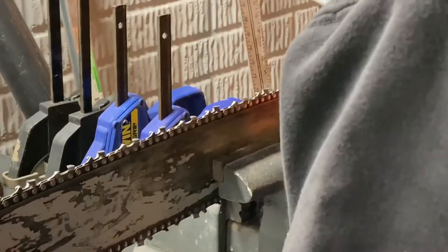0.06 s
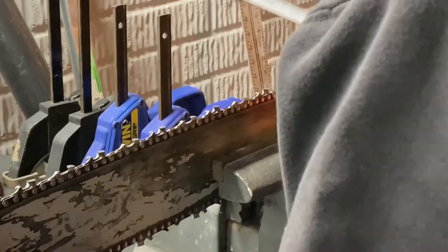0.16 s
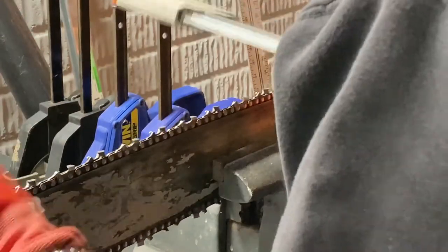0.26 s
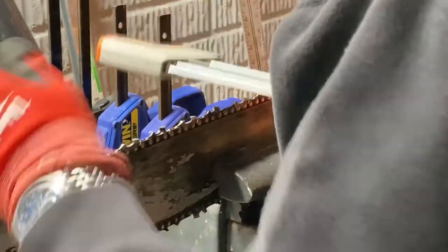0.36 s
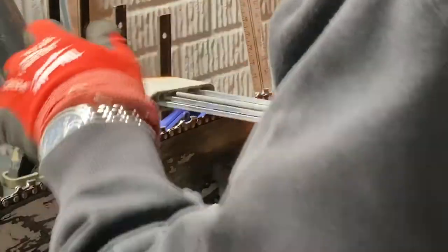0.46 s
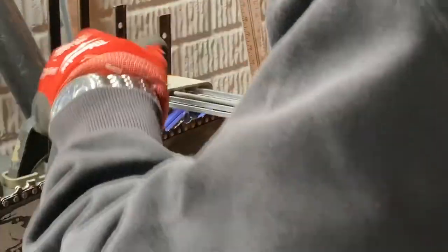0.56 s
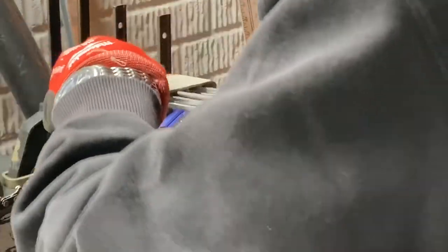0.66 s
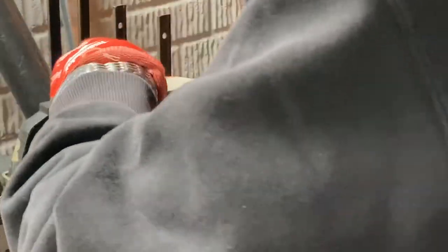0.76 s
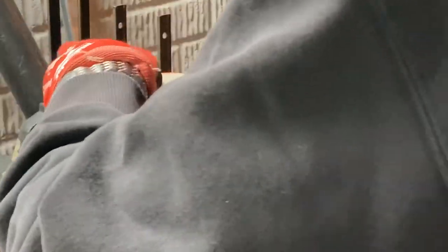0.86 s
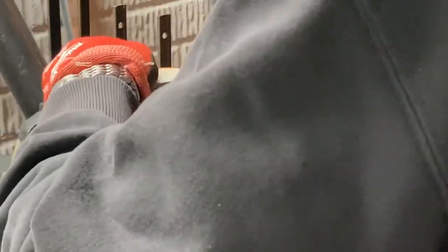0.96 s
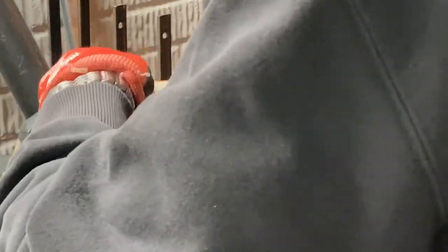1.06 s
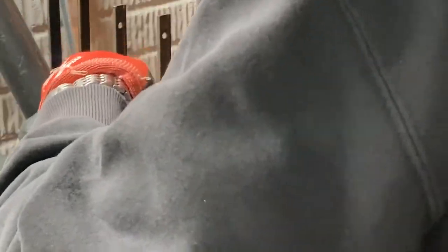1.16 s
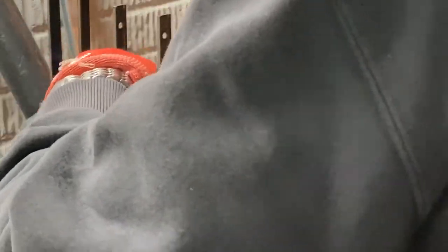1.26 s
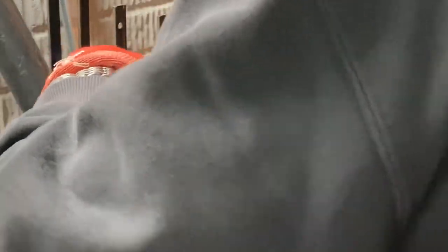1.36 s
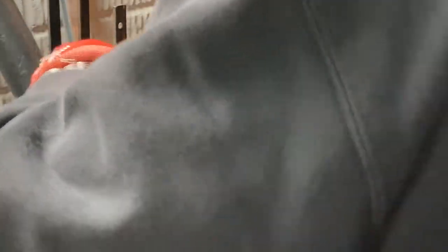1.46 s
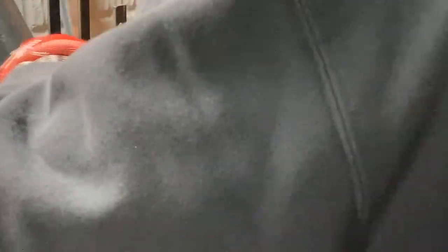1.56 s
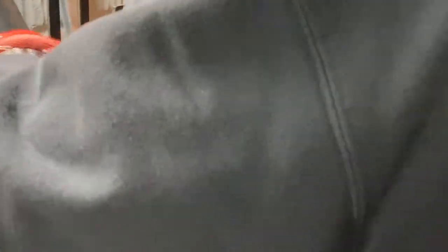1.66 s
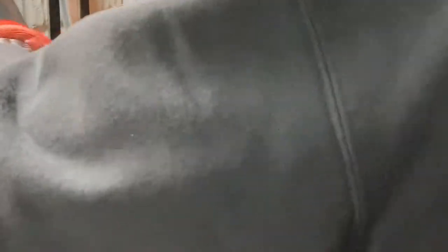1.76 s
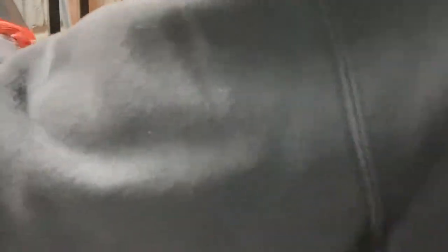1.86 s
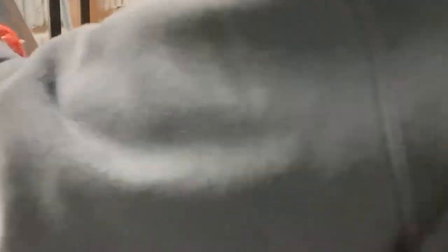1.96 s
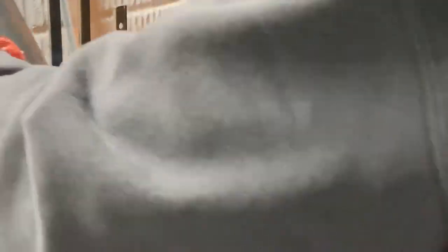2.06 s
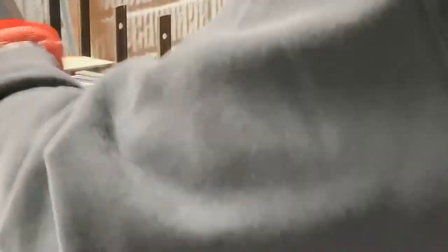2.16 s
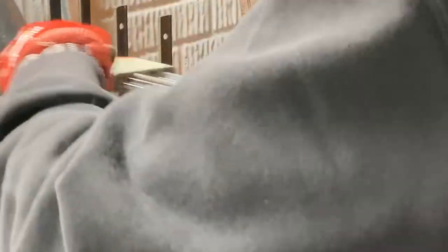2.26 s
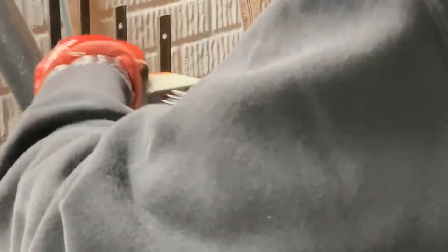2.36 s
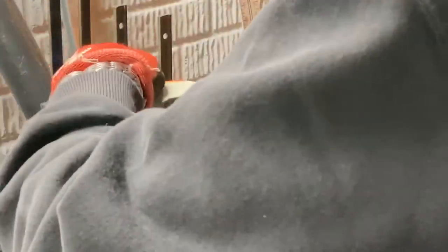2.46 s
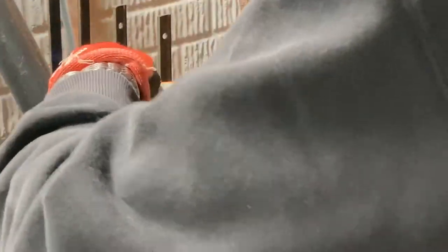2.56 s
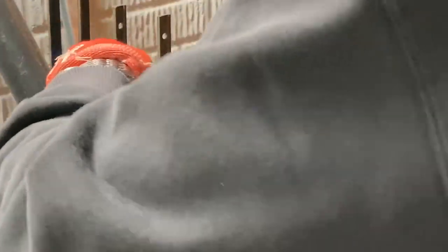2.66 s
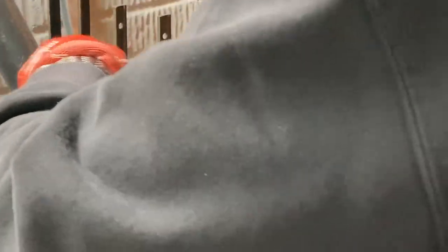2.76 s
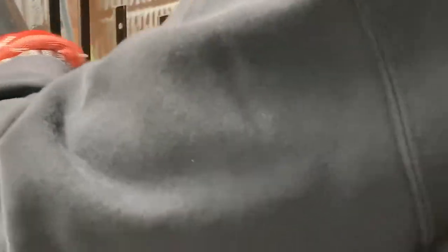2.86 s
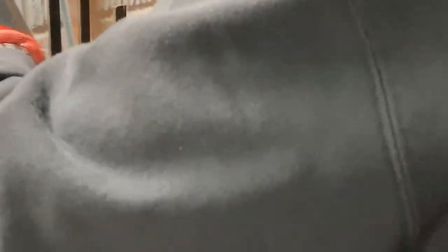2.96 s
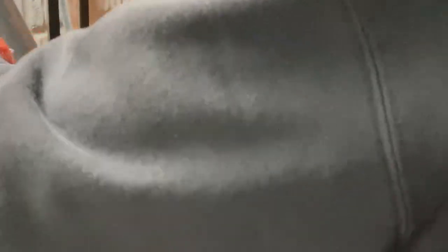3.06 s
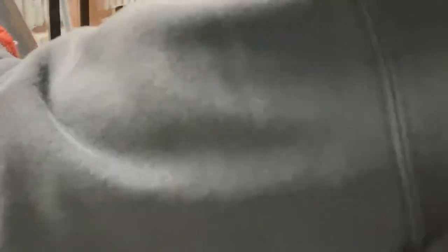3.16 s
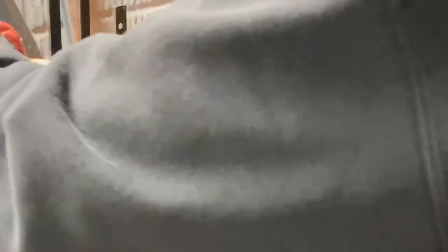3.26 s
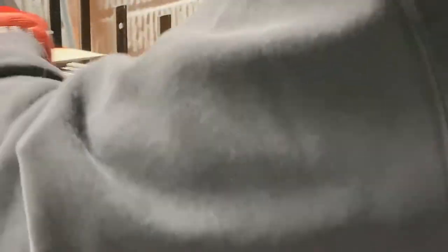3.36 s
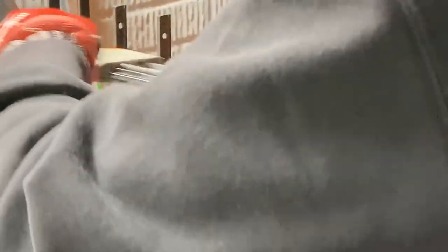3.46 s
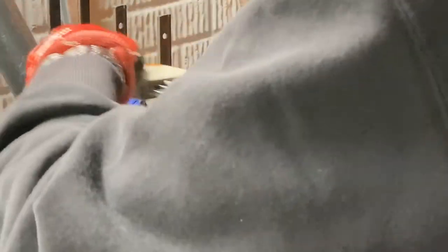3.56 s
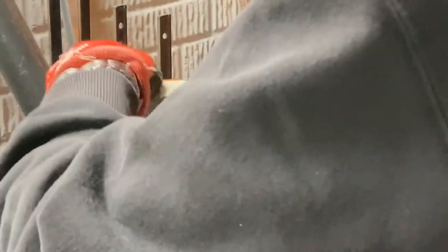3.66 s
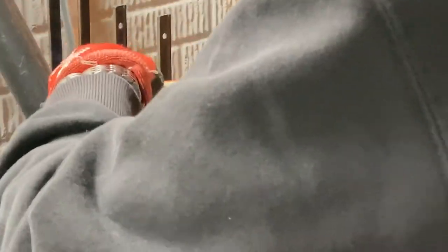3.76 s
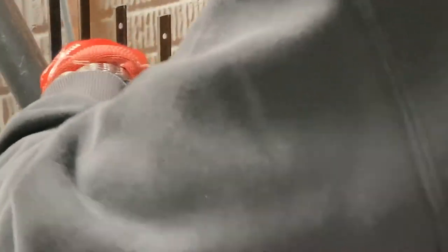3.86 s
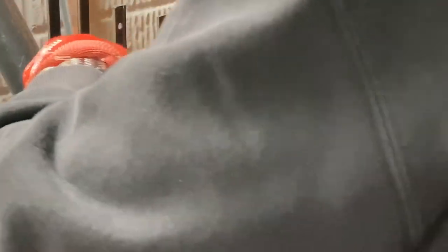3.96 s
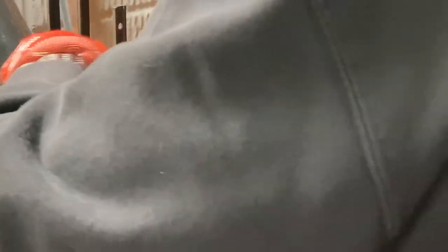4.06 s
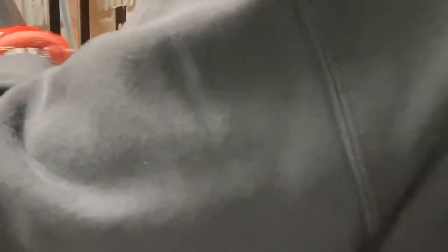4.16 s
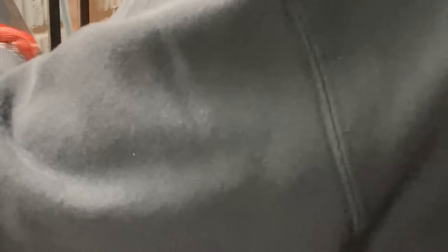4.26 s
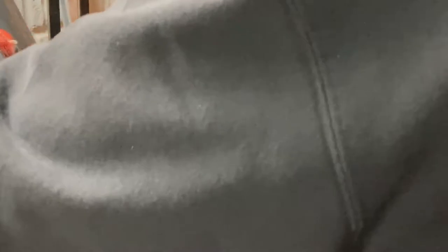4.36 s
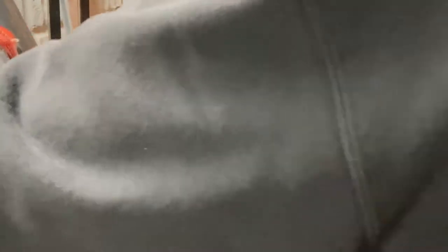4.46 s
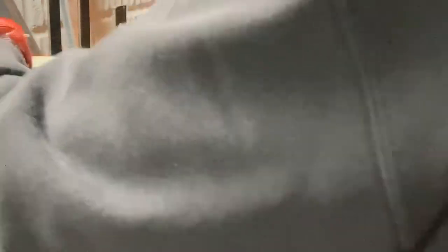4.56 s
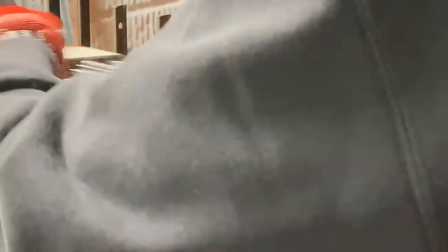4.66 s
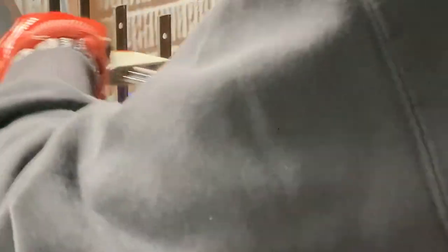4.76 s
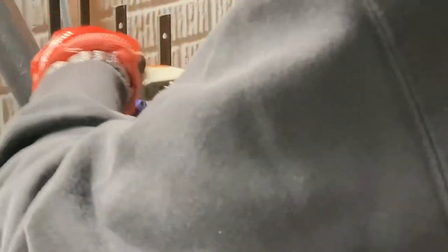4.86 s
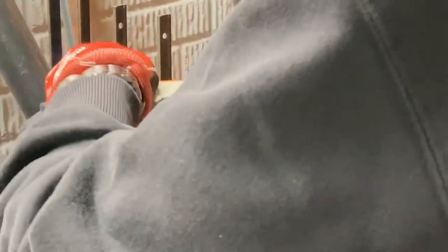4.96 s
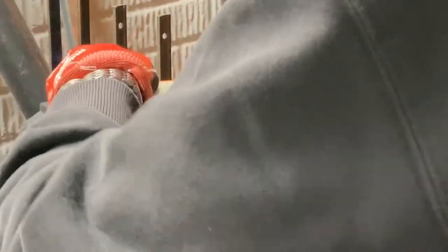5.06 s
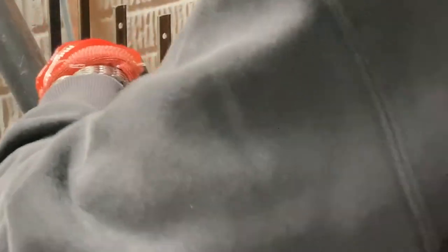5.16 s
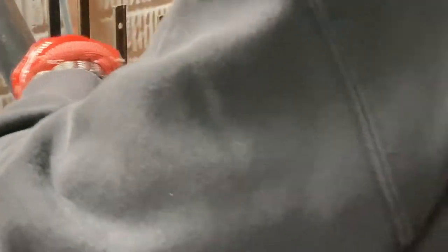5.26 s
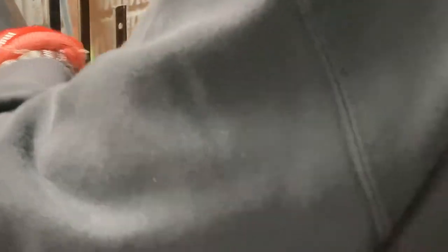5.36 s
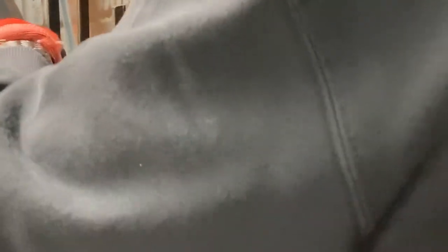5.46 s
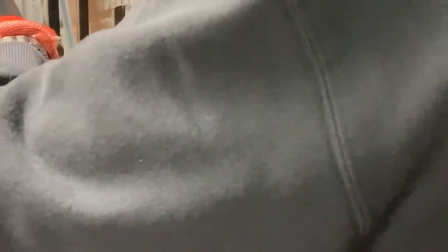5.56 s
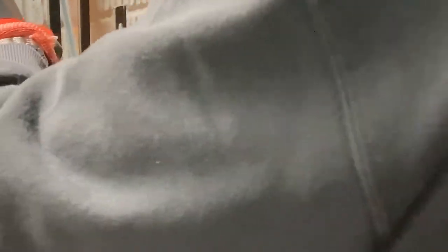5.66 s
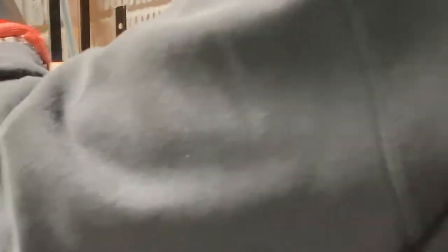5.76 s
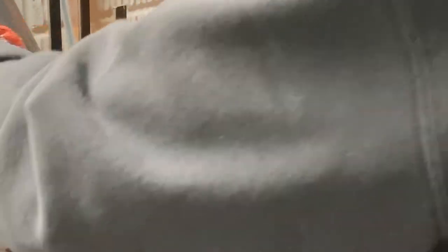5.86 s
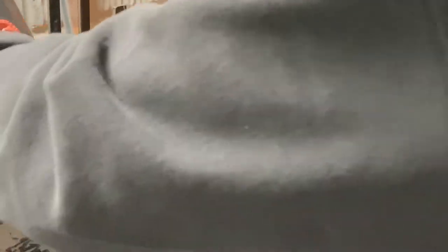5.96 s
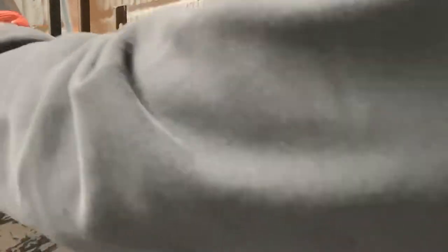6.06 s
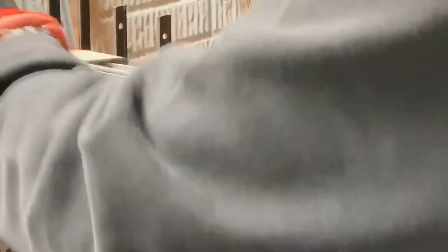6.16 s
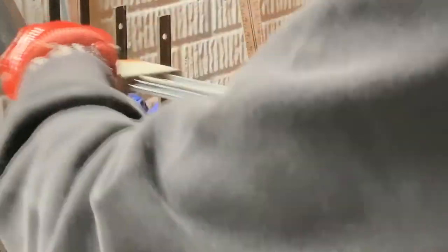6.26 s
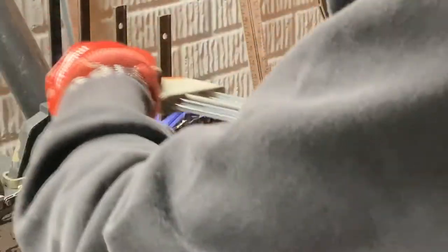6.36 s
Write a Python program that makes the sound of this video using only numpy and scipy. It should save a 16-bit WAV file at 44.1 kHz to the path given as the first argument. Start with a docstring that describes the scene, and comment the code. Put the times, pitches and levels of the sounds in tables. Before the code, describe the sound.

Gritty, slightly whining file strokes sharpen a saw chain in a vise, separated by short pauses with small metallic clicks and scuffs.

```python
"""A round file sharpens a saw chain clamped in a bench vise, in a small workshop where a fan hums far off.
First the file is set down, drags lightly and ticks on the steel. From 1.4 s come four firm strokes:
the teeth tear off chips in a gritty rasp that rings the chain's bar and the file, with a whine that
glides with the stroke speed. Along the way the file ticks and scuffs, and the vise rocks.
Near 5.8 s comes a short, weak fifth stroke; last, the lifted file brushes the chain."""
import sys
import numpy as np
from scipy import signal
from scipy.fft import rfft, irfft, next_fast_len
from scipy.io import wavfile
from scipy.ndimage import uniform_filter1d, map_coordinates

SR = 44100
rng = np.random.default_rng(int(sys.argv[2]) if len(sys.argv) > 2 else 0)


def unload_wav(signal):
    """Save mono or channel-first audio to the path in sys.argv[1] as 16-bit WAV at rate SR, clipped to [-1, 1]."""
    wavfile.write(
        sys.argv[1],
        SR,
        np.round(np.clip(np.atleast_2d(signal).T, -1, 1) * 32767).astype(np.int16),
    )


N = 282681

# The push of the file, one list per stroke: (time [s], rasp level [dB], teeth passing [1/s])
STROKES = [
    [(1.41, -57.5, 80), (1.5, -30.5, 242), (1.55, -27.5, 560), (1.63, -24.5, 850), (1.664, -29.5, 860),
     (1.762, -37, 381), (1.81, -30, 398), (1.86, -36.5, 420), (1.89, -45.5, 557), (1.93, -42.5, 420),
     (2.028, -35.5, 400), (2.04, -48.5, 400)],
    [(2.727, -27.5, 233), (2.75, -29.5, 450), (2.837, -26, 810), (2.89, -28, 896), (2.942, -31, 865),
     (3.0, -30, 691), (3.02, -28, 740), (3.098, -27.5, 869)],
    [(3.885, -50.5, 75), (3.969, -36, 117), (4.08, -31.5, 350), (4.152, -27.5, 764), (4.224, -32, 757),
     (4.27, -28, 700), (4.35, -31, 595), (4.407, -37, 470), (4.425, -53, 430)],
    [(5.21, -47, 80), (5.252, -32, 188), (5.3, -30, 640), (5.354, -27, 758), (5.414, -29, 781),
     (5.48, -31.5, 398), (5.514, -35.5, 400), (5.55, -50, 400)],
    [(5.753, -37.5, 350), (5.853, -41, 400), (5.913, -38, 480), (5.92, -39, 480)],
]
# The tone of each stroke: (whine start [s], whine boost [dB], octave boost [dB], upper bar boost [dB])
STROKE_TONES = [(1.559, 1.5, 6.5, 4.5), (2.745, -1, 6.5, 0), (4.12, 3, 1.5, 5), (5.321, 1, 7.5, 4.5),
                (5.831, -8, -1, 4)]
# Moments when the file squeals more, or less: (time [s], half length [s], boost [dB])
SQUEALS = [(1.5, .03, 2), (1.63, .02, 3), (1.8, 0.028, -4), (2.731, 0.0071, 13.5), (3.0, 0.04, 22),
           (4.27, .04, 21.5)]
def strokes():
    """Each tooth bites once: chips come in bunches as a rasp, and the regular push sings as a whine."""
    firm_db, firm_teeth_per_s, busy_teeth_per_s = -30.5, 723, 450
    t = np.arange(N) / SR
    gate, rasp_db, teeth_per_s = curves(STROKES, edge_s=0.0012)
    spans = [[(path[0][0], 0, *tone), (path[-1][0], 1, *tone)]
             for path, tone in zip(STROKES, STROKE_TONES)]
    _, progress, whine_start, boost_db, octave_db, upper_db = curves(spans, edge_s=0.002)
    drop_db = firm_db - rasp_db  # how much weaker than a firm stroke

    phase = 2 * np.pi * np.cumsum(teeth_per_s * (1 + 0.011 * wobble(150))) / SR
    bite = 1 + 0.34 * np.cos(phase)
    hand_pressure = amp(0.68 * wobble(60) + 0.6 * wobble(200))
    busy = np.clip((teeth_per_s / busy_teeth_per_s) ** 2, 0.05, 1)  # a slow file tears fewer chips
    torn = chips(5000 * busy, spread_db=2.5) * np.sqrt(np.mean(busy) / busy)
    hiss = 0.51 * busy ** 0.1 * rng.standard_normal(N)
    force = patchy(bite * hand_pressure * (torn + hiss), depth_db=2)
    squeal_db = 4 * wobble(30) + sum(db * np.exp(-((t - s) / half) ** 2) for s, half, db in SQUEALS)
    forces = force * gate * amp(rasp_db) * shares(
        low_bar=1.5 + 0.62 * drop_db * np.clip(0.3 + 3 * progress, 0, 1),
        upper_bar=upper_db - 8 * progress - 0.16 * drop_db,
        squeal=-12 - 11.5 * progress + squeal_db,
        rod=-1.5, fine_chips=-11.5 + 0.13 * drop_db, cutter=-14)

    fade_in = gate * np.clip((t - whine_start) / 0.04, 0, 1)
    flutter_db, slip = 2.6 * wobble(110), 0.3 * wobble(140)
    speed_db = 7.5 * np.log2(teeth_per_s / firm_teeth_per_s)  # faster is louder
    whine_db = -22 + speed_db - 0.46 * drop_db + boost_db - 4 * progress
    whine = fade_in * amp(whine_db + flutter_db) * np.sin(phase)
    octave_level = amp(whine_db + octave_db - 12 * progress + 3.6 * wobble(70))
    octave = fade_in * octave_level * np.sin(2 * phase + slip)
    # the octave swells as it glides across the bar's upper notes
    whine += filtered(octave, lambda hz: resonance(BAR_NOTES, hz) / (1 + (1400 / (hz + 1)) ** 5))
    return forces, whine


# Notes of the clamped bar and chain, the file's rod damped by the hands, the rod ringing freely,
# and the cutter under the file: (pitch [Hz], width [Hz], level [dB])
BAR_NOTES = [(262, 72, -21), (417, 55, 1), (641.7, 121, 2), (788, 100, 2.5), (1000, 81, 3),
             (1184, 100, 0.5), (1424, 83, -4.5), (1540.4, 47, 2), (1707, 36, -4), (1801, 35, 4),
             (1822, 160, -0.5), (2143, 35, -2), (2288, 150, -11)]
ROD_NOTES = [(2758, 100, 9), (3730, 250, 0.5), (4360, 170, -17.5), (7400, 500, -13), (12800, 300, -20)]
SQUEAL_NOTES = [(6870, 110, 0), (9910, 70, -11), (13600, 200, -26)]
CUTTER_NOTES = [(2050, 400, 2.5), (2820, 700, -2)]
# The noise of tearing chips: (frequency [Hz], level [dB])
CHIP_NOISE = [(1180, -32), (2000, -4.5), (2660, -7.5), (4130, -9), (5060, -6.5), (5640, -9), (6850, -6.5),
              (8390, -26), (13700, -38), (14600, -44.5), (15000, -50)]
def steel(forces):
    """The steel rings when pushed: each of the six forces from shares() sounds through its own part."""
    size = next_fast_len(N + SR // 2)
    hz = np.fft.rfftfreq(size, 1 / SR)
    above = lambda edge_hz: 1 / (1 + (edge_hz / (hz + 1)) ** 10)
    bar, grit = resonance(BAR_NOTES, hz), amp(along(CHIP_NOISE, hz))
    rod = unit(grit * (1 - above(8200))) + amp(-15.5) * unit(np.abs(resonance(ROD_NOTES, hz)))
    fine_chips = grit * above(8200) * (1 + 2 / (1 + ((hz - 13000) / 900) ** 2))
    parts = [bar * (1 - above(1320)), bar * above(1320), rod,
             resonance(SQUEAL_NOTES, hz), fine_chips, resonance(CUTTER_NOTES, hz)]
    spectrum = sum(rfft(force, size) * unit(part) for force, part in zip(forces, parts))
    return irfft(spectrum, size)[:N]


# The file hits the steel: (time [s], level [dB], knock boost [dB], crack boost [dB])
TICKS = [(0.5268, -21, -11, -37), (0.6285, -62, 15, -17), (0.7158, -27, -7, -31), (0.7225, -28, 2.5, -12),
         (0.7315, -32, 2, -2), (0.7452, -14.5, -3.5, -1.5), (0.7565, -28, 9, -12.5),
         (0.7636, -46, -19, -22), (0.9964, -68.5, 23.5, -11), (1.1276, -9, -13, -11.5),
         (1.1778, -39.5, 10, -32), (1.1944, -29, -3, -34), (1.2062, -18, -5, -33), (1.2154, -19, -3, -28),
         (1.4102, -38.5, 17, -21), (1.4306, -28, 13, -18), (1.4384, -31, 8, -9.5), (1.4473, -34, 13, -8),
         (1.504, -19, 3, -18.5), (1.5489, -18.5, 4.5, -22), (1.6124, -11.5, 2.5, -24),
         (2.0228, -20, -19, 4), (2.4648, -23, -7, -35), (2.4912, -35.5, 0, -3), (2.6679, -35.5, 11, -25.5),
         (2.6828, -18, 5.5, -38.5), (2.7275, -9, -3, -3), (2.7591, -19.5, 3.5, -30),
         (2.7633, -10.5, -10, -24), (3.738, -30, -1.5, -19), (3.8696, -42.5, -5, -8),
         (3.8867, -30.5, 0, -9), (3.9074, -34, 6, -8), (3.9424, -22.5, 3, -6.5), (3.9544, -13, -8, -10),
         (4.01, -17, -7.5, -3), (4.054, -14.5, -1.5, -23), (4.062, -17, 1, -10), (5.0122, -17, -10.5, -23),
         (5.2124, -24, 8.5, -5), (5.226, -18.5, -2.5, -26.5), (5.249, -20, -9, -17),
         (5.2799, -14, -10, -11.5), (5.301, -21.5, -2, -30), (5.535, -31.5, 16.5, -4),
         (5.7533, -25, 1, -21)]
def ticks():
    """Each tick is a sharp blow on the steel, then a short burst of chatter that dies away."""
    chatter, blows = np.zeros((6, N + SR)), np.zeros((6, N))
    t = np.arange(SR // 8) / SR
    burst = amp(-6 - 60 * t / 0.003) + amp(-9 - 60 * t / 0.018) + amp(-24.5 - 60 * t / 0.063)
    for time, db, knock_db, crack_db in TICKS:
        at = round(time * SR)
        strength = amp(db) * shares(low_bar=knock_db - 4.5, upper_bar=knock_db + 0.5, rod=-3,
                                    squeal=-13, fine_chips=crack_db - 4, cutter=0.47 * knock_db - 6)
        blows[:, at:at + 1] += strength
        chatter[:, at:at + len(t)] += strength * burst
    blows *= shares(low_bar=7, upper_bar=5.5, rod=-6, squeal=-0.5, fine_chips=-2.5, cutter=10.5)
    chatter *= shares(low_bar=-7, upper_bar=-7.5, rod=0.5, squeal=-4, fine_chips=1, cutter=-5.5)
    return blows + chatter[:, :N] * rng.choice([-1, 1], N)


# The file slides without cutting:
# (start [s], end [s], start level [dB], end level [dB], bar boost [dB], hiss boost [dB])
DRAGS = [(0.542, 0.584, -62.5, -61.5, 8.5, -13), (0.587, 0.72, -61.5, -53.5, 7.5, -17),
         (0.767, 0.83, -73, -68, -17, -8), (1.137, 1.196, -58, -61, 7.5, -25),
         (1.22, 1.31, -60, -48, 4, -16), (1.378, 1.412, -61, -66, -7.5, -11),
         (2.469, 2.533, -46, -46, 6.5, -9.5), (3.105, 3.25, -42.5, -70.5, 2, -46),
         (3.751, 3.78, -55.5, -71, 1.5, -1), (3.855, 3.882, -63.5, -51, 8.5, -9),
         (4.425, 4.549, -51.5, -76, 8.5, -35), (4.86, 5.008, -86, -70.5, -6, -4),
         (5.03, 5.126, -50, -61, -8, -14), (5.115, 5.222, -59.5, -31.5, -1, -16.5),
         (5.555, 5.713, -52.5, -76, 2, -14)]
def drags():
    """Without pressure the teeth only skip over the steel, in a faint, patchy scrape."""
    ramps = [[(start, start_db, *boosts), (end, end_db, *boosts)]
             for start, end, start_db, end_db, *boosts in DRAGS]
    gate, level_db, bar_db, hiss_db = curves(ramps, edge_s=0.016)
    skips = amp(3 * wobble(90))
    scrape = chips(1500, spread_db=3) + 1.1 * rng.standard_normal(N)
    force = patchy(skips * scrape, depth_db=6) * gate * amp(level_db)
    return force * shares(low_bar=bar_db - 8, upper_bar=bar_db - 6.5, rod=-3.5,
                          squeal=-15.5, fine_chips=hiss_db, cutter=bar_db - 3)


# The vise rocks on the bench:
# (time [s], level [dB], pitch [Hz], upper note boost [dB], loss per bounce [dB])
VISE_KNOCKS = [(0.763, -34.5, 379, -19.5, 9), (1.641, -25, 354.6, 16, 1), (3.114, -28, 284, -12, 2.5),
               (3.163, -24, 300, 10.5, 1), (3.208, -25.5, 299, 5, 1.5), (3.244, -30, 287, -1, 3.5),
               (4.437, -27.5, 245, -19, 4), (4.465, -23, 270, -12, 2.5), (5.455, -31, 390, -4, 15),
               (5.97, -39, 264, -24.5, -2)]
def vise():
    """Soft, low knocks, each with three quick bounces; every contact shakes the bar a little."""
    bounce_s, upper_hz = 0.0072, 730
    knocks, shake, t = np.zeros(N + SR), np.zeros(N + SR), np.arange(SR // 6) / SR
    low_shape = amp(-60 * t / 0.043) * (1 - np.exp(-t / 0.003)) ** 2
    upper = amp(-60 * t / 0.0067) * (1 - np.exp(-t / 0.002)) * np.sin(2 * np.pi * upper_hz * t)
    for time, first_db, hz, upper_db, loss_db in VISE_KNOCKS:
        for bounce in range(4):
            gap_scale, pitch_scale = 1 + 0.08 * rng.standard_normal(2)
            at = round((time + bounce * bounce_s * gap_scale) * SR)
            db = first_db - bounce * loss_db
            low = low_shape * np.sin(2 * np.pi * hz * pitch_scale * t)
            knocks[at:at + len(t)] += amp(db + 6) * (low + amp(upper_db) * upper)
            shake[at:at + len(t)] += amp(db + 1 - 60 * t / 0.023)
    rattle = shake[:N] * rng.standard_normal(N)
    return knocks[:N] + filtered(rattle, lambda hz: resonance(BAR_NOTES, hz) / (1 + (hz / 2500) ** 4))


# The lifted file brushes the chain:
# (time [s], level [dB], rise [s], plate boost [dB], pin boost [dB], edge boost [dB], hiss boost [dB])
SCUFFS = [(0.8845, -52.5, 0.0042, 9, -29, -2, -27), (2.151, -38, 0.005, -20, -30, -3, -33),
          (3.348, -41.5, 0.0027, -26.5, -41, -12.5, -46), (4.6403, -29.5, 0.0037, -8.5, -17, -2.5, -8),
          (6.1325, -32, 0.0061, -28, -38.5, -6.5, -21), (6.2055, -55.5, 0.012, 26, 15.5, 4, 14)]
# Notes of a loose chain link (three for its body, one for its pin, three for its edge)
# and of the bar's flat plate: (pitch [Hz], width [Hz], level [dB])
LINK_NOTES = [(1820, 180, -11.5), (2400, 283, 4), (2930, 88, -5.5), (3615, 116, 6), (4710, 270, 7.5),
              (5200, 680, 13), (7230, 840, 20.5)]
PLATE_NOTES = [(1030, 140, -2.5), (1110, 80, -1), (1405, 185, 6.5), (1710, 110, -13)]
def scuffs():
    """A soft touch is a brief swell of noise that rings the link and the plate."""
    out, t = np.zeros(N + SR), np.arange(SR // 6) / SR
    plate, link = ring(PLATE_NOTES, t), ring(LINK_NOTES[:3], t)
    pin, edge = ring(LINK_NOTES[3:4], t), ring(LINK_NOTES[4:], t)
    fade = amp(-60 * t / 0.024) + amp(-20 - 60 * t / 0.12)
    for time, db, rise_s, plate_db, pin_db, edge_db, hiss_db in SCUFFS:
        swell = (1 - np.exp(-t / rise_s)) ** 1.07
        push = amp(db) * swell * fade * rng.standard_normal(len(t))
        metal = link + amp(plate_db - 3.5) * plate + amp(pin_db - 7) * pin + amp(edge_db) * edge
        ringing = signal.fftconvolve(push, metal)[:len(t)]
        hiss = np.diff(push, n=6, prepend=np.zeros(6))  # keeps only the highest treble
        at = round(time * SR)
        out[at:at + len(t)] += amp(-5) * ringing + amp(hiss_db - 18) * hiss
    return out[:N]


# The workshop's echo: (frequency [Hz], time to fade by 60 dB [s])
ECHO_TIMES = [(200, 0.17), (1000, 0.24), (4000, 0.25), (7000, 0.13), (12000, 0.076)]
def workshop_echo(sound):
    """The room answers with a short echo in which each frequency dies at its own speed."""
    hz, t, noise = signal.stft(rng.standard_normal(SR // 2), SR, nperseg=256)
    fade = amp(-60 * t / along(ECHO_TIMES, hz)[:, None])
    tail = signal.istft(noise * fade, SR, nperseg=256)[1]
    delayed = np.pad(sound, (250, 0))
    return signal.fftconvolve(delayed, tail / np.linalg.norm(tail))[:N]


# The noise of the room's air: (frequency [Hz], relative level [dB])
AIR_NOISE = [(18, -87), (30, -55), (167, -38.5), (222, -5.5), (328, -10.5), (384, -9), (448, -9.5),
             (485, -8), (538, -23), (613, -12), (1090, -23), (4540, -39.5), (6530, -37.5), (13200, -44.5),
             (15000, -55.5)]
# The far fan's tones: (pitch [Hz], level [dB])
FAN_TONES = [(274.5, -68), (355.3, -77.5), (479.1, -72.5), (597.5, -71.5), (629.8, -71), (1254, -83)]
def air_and_fan():
    """Steady room noise with the wavering hum of a fan."""
    t = np.arange(N) / SR
    hiss = unit(filtered(rng.standard_normal(N), lambda hz: amp(along(AIR_NOISE, hz))))
    hum = sum(amp(db + 3 * wobble(3)) * np.sin(2 * np.pi * hz * t + 2.8 * wobble(13))
              for hz, db in FAN_TONES)
    return amp(-62 + 1.2 * wobble(3)) * hiss + hum


def shares(low_bar, upper_bar, rod, squeal, fine_chips, cutter):
    """How hard each part of the steel is driven: six levels in dB become six rows of gains."""
    return amp(np.vstack(np.broadcast_arrays(low_bar, upper_bar, rod, squeal, fine_chips, cutter)))


def chips(per_s, spread_db):
    """Chips break off as random clicks of unequal size."""
    hits = rng.random(N) < per_s / SR
    return unit(hits * rng.choice([-1, 1], N) * amp(spread_db * np.minimum(rng.exponential(size=N), 4)))


def patchy(sound, depth_db):
    """Pitches swell and fade in patches: the contact moves along the file and favours other notes."""
    spectrum = signal.stft(sound, nperseg=256)[2]
    patches = uniform_filter1d(rng.standard_normal(spectrum.shape), size=4, axis=0)
    patches = uniform_filter1d(patches, size=9, axis=1)
    return unit(signal.istft(spectrum * amp(depth_db * unit(patches)), nperseg=256)[1][:N])


def resonance(notes, hz):
    """How a part with these notes answers a push at each frequency."""
    return sum((-1) ** k * amp(db) * 1j * hz * width / (pitch ** 2 - hz ** 2 + 1j * hz * width)
               for k, (pitch, width, db) in enumerate(notes))


def ring(notes, t):
    """The notes after a soft tap; wider ones die sooner."""
    tones = sum(amp(db) * np.exp(-np.pi * width * t) * np.sin(2 * np.pi * hz * t)
                for hz, width, db in notes)
    return tones * (1 - np.exp(-t / 0.001)) ** 2


def curves(paths, edge_s):
    """A gate (1 during each path, 0 between), then a curve for each column after the time."""
    t = np.arange(N) / SR
    step = lambda time: np.clip((t - time) / edge_s + 0.5, 0, 1)
    gate = sum(step(path[0][0]) - step(path[-1][0]) for path in paths)
    times, *columns = np.concatenate(paths).T
    return [gate] + [np.interp(t, times, column) for column in columns]


def wobble(per_s):
    """A smooth curve through per_s random values a second."""
    return map_coordinates(rng.standard_normal(int(N * per_s / SR) + 4), [np.arange(N) * per_s / SR])


def filtered(sound, response):
    """Scales each frequency of a sound by response(hz)."""
    size = next_fast_len(N + SR // 2)
    return irfft(rfft(sound, size) * response(np.fft.rfftfreq(size, 1 / SR)), size)[..., :N]


def along(points, hz):
    """Reads between (frequency, value) points, with octaves evenly spaced."""
    frequencies, values = np.transpose(points)
    return np.interp(np.log(hz + 1), np.log(frequencies + 1), values)


def amp(db):
    """Turns decibels into a gain."""
    return 10 ** (np.asarray(db) / 20)


def unit(x):
    """Scales to an average power of 1."""
    return x / np.sqrt(np.mean(np.abs(x) ** 2) + 1e-20)


def scene():
    """The filing, the vise and the scuffs, with their echo and the background, in one channel."""
    cutting, whine = strokes()
    work = steel(cutting + drags() + ticks()) + whine + vise()
    brushing = scuffs()
    echo = amp(-15) * workshop_echo(work + amp(-9) * brushing)
    return (work + brushing + echo + air_and_fan())[None]


def record(dry):
    """Cuts the bass steeply (a trace still passes), rounds off the treble and drops the very top."""
    bass_cut = signal.butter(6, 190, "high", fs=SR, output="sos")
    treble_cut = lambda hz: (hz < 15165) / (1 + (hz / 14400) ** 90)
    return filtered(signal.sosfilt(bass_cut, dry) + amp(-28.5) * dry, treble_cut)


dry = scene()
out = record(dry)
unload_wav(out)
```